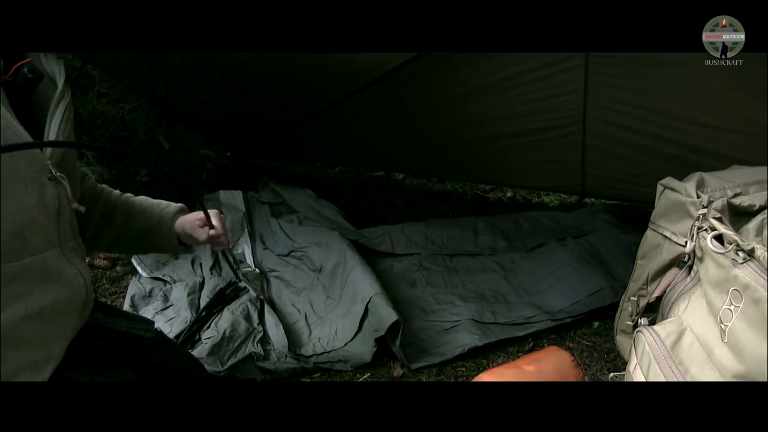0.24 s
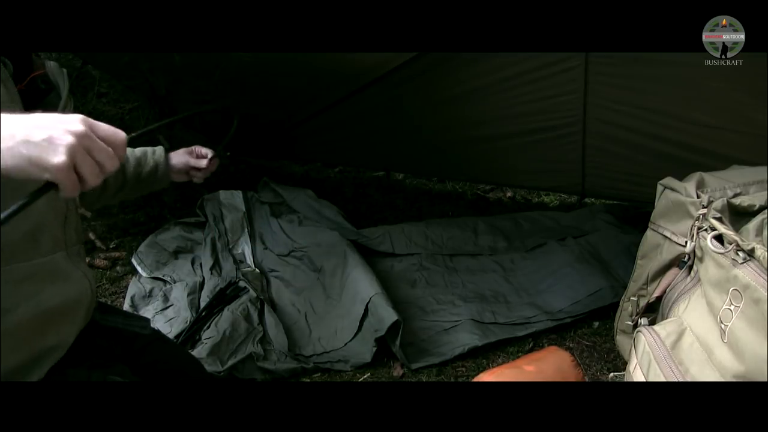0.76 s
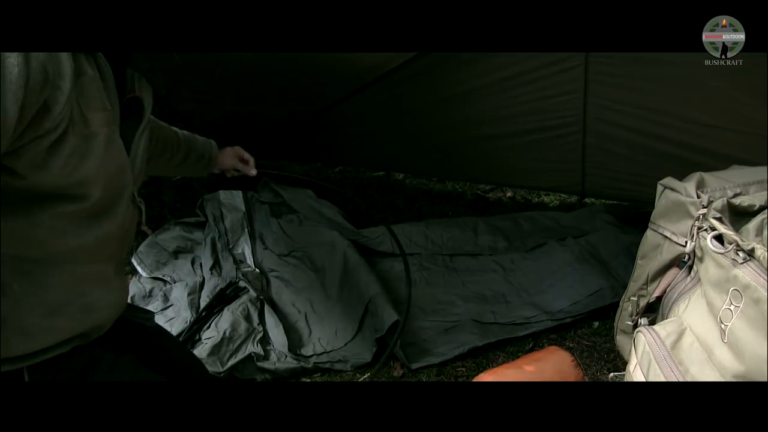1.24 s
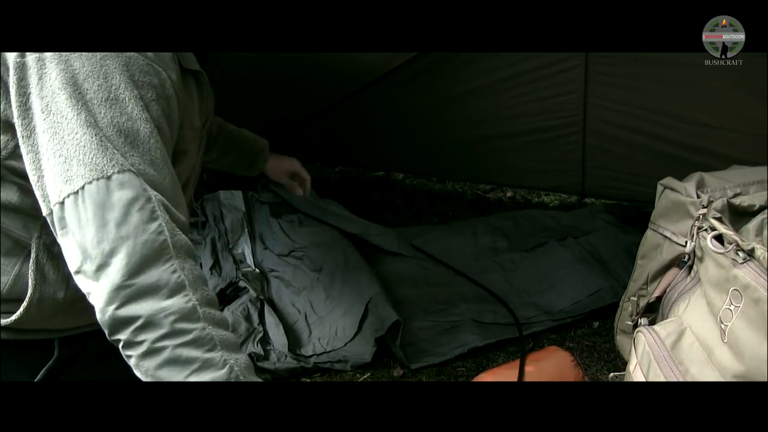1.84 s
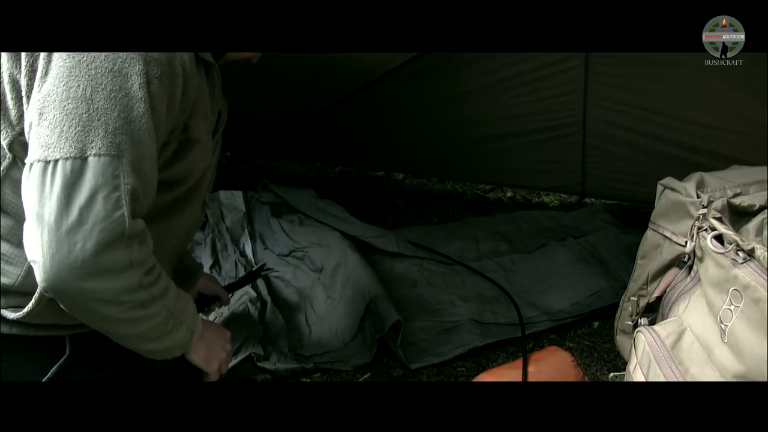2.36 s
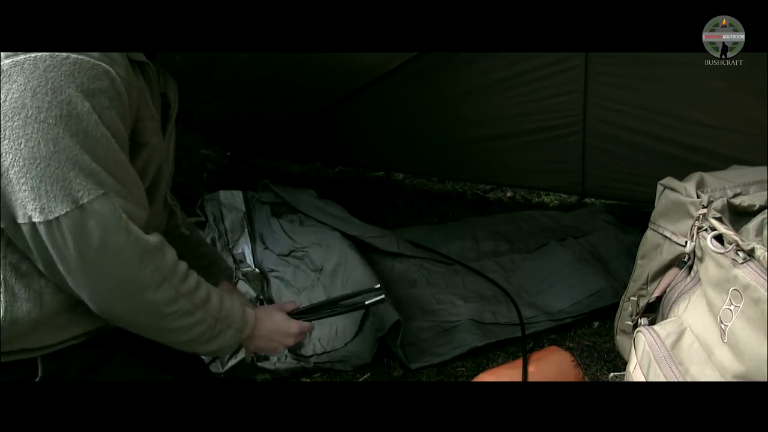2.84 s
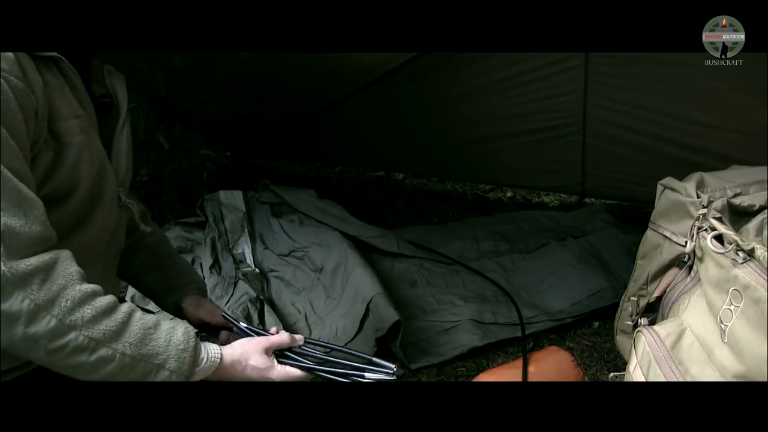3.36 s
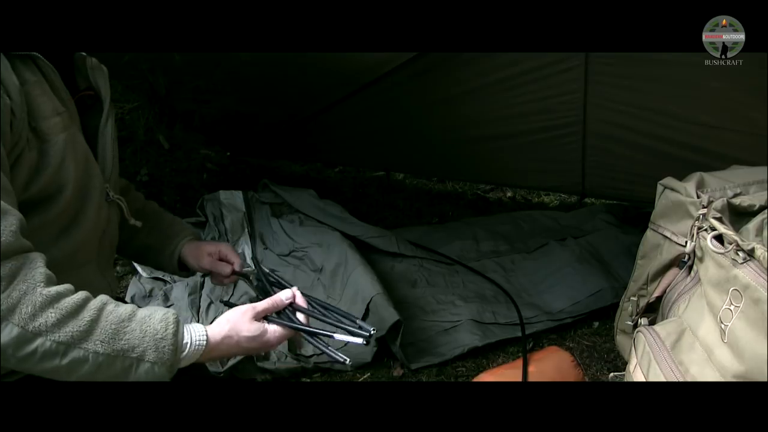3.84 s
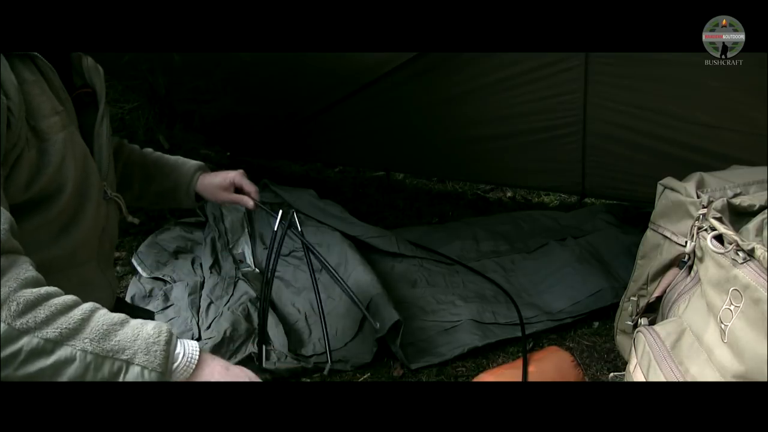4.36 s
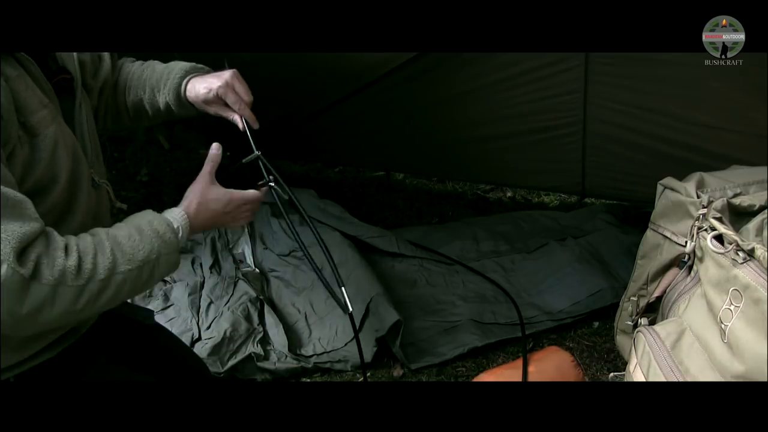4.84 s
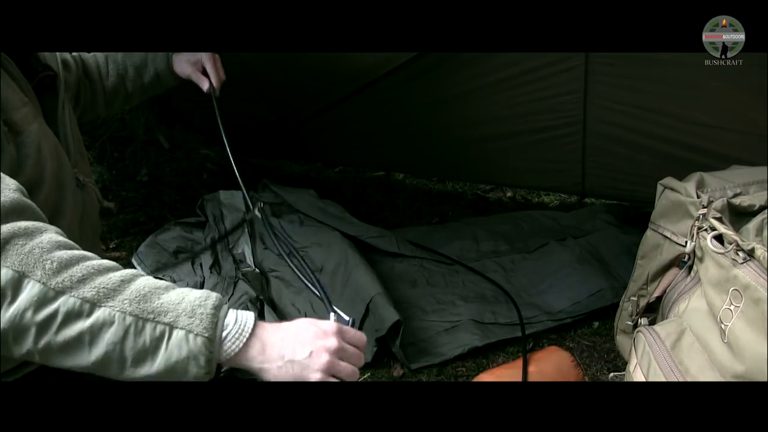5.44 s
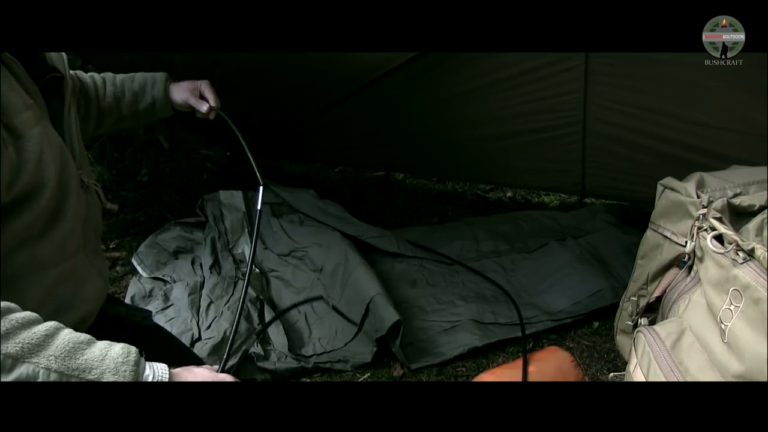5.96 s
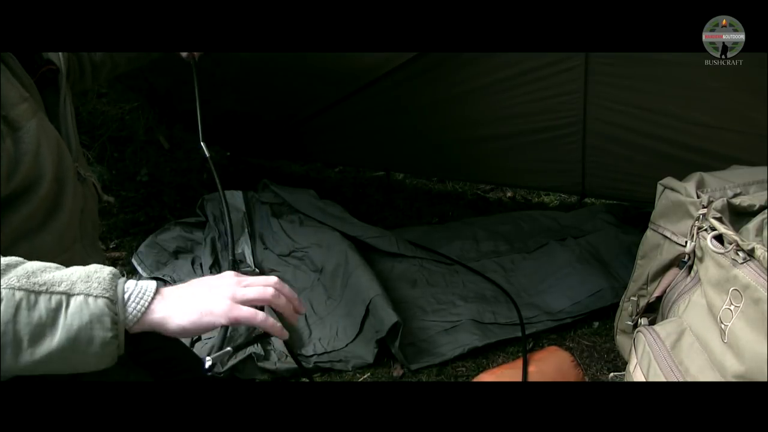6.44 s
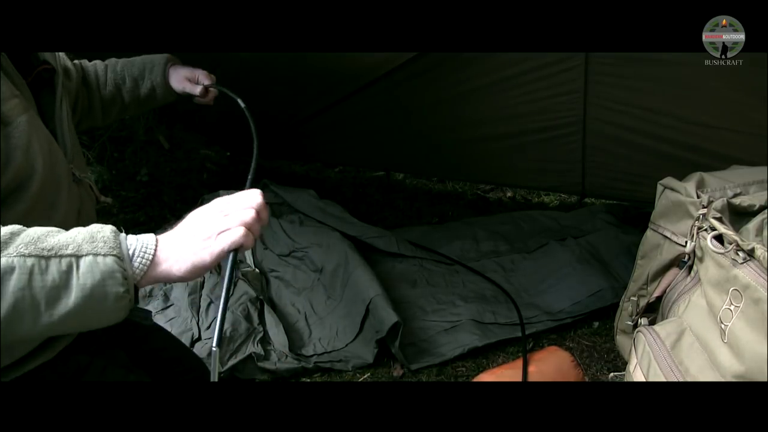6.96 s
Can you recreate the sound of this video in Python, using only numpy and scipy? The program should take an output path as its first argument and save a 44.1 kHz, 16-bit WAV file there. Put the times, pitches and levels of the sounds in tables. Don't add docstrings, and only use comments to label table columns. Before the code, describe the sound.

Hollow tent pole sections crack and rattle together close by, with cloth rustling, small birds whistling in echoing woods and a faint low drone.

```python
import sys
import numpy as np
from scipy import signal
from scipy.fft import rfft, irfft, next_fast_len
from scipy.io import wavfile
from scipy.ndimage import uniform_filter1d, map_coordinates

SR = 44100
rng = np.random.default_rng(int(sys.argv[2]) if len(sys.argv) > 2 else 0)


def invert_db(x):
    u = np.asarray(x, float) / 20
    return 10 ** u


def inscribe(sig):
    pcm = np.round(np.clip(np.atleast_2d(sig).T, -1, 1) * 32767)
    wavfile.write(sys.argv[1], SR, pcm.astype(np.int16))


N = 317520


def unit(x):
    return x / np.sqrt(np.mean(x ** 2) + 1e-20)


def along(points, hz):
    f, v = np.transpose(points)
    return np.interp(np.log(hz + 1), np.log(f + 1), v)


def curves(rows):
    s, *cols = np.transpose(rows)
    return [np.interp(np.arange(N) / SR, s, c) for c in cols]


def wobble(rate):
    knots = rng.standard_normal(int(N * rate / SR) + 4)
    return map_coordinates(knots, [np.arange(N) * rate / SR])


def rush(spectrum, alike, grain=1):
    m = next_fast_len(N + 8192)
    hz = np.fft.rfftfreq(m, 1 / SR)
    turn = np.arccos(np.clip(along(alike, hz), -1, 1)) / 2
    pair = rfft(rng.standard_normal((2, N)) * grain, m) * invert_db(along(spectrum, hz))
    mid, side = irfft(pair * [np.cos(turn), np.sin(turn)], m)[:, :N]
    return unit(np.array([mid + side, mid - side]))


def echoes(x, t60, delay):
    t = np.arange(round(t60 * SR)) / SR
    tail = rng.standard_normal((2, SR))[:, :len(t)] * invert_db(-60 * t[:SR] / t60) * (t[:SR] > delay)
    return signal.fftconvolve(x[None], tail / np.linalg.norm(tail[0]), axes=1)[:, :N]


def resonance(hz, centre, width):
    return 1j * hz * width / (centre ** 2 - hz * hz + 1j * hz * width)


# time in seconds, peak in dB, treble over middle in dB,
# low knock over middle in dB, strongest ring in Hz.
SNAPS = [(.3192, -9.5, 0, -5, 6300), (2.3459, -10, -3.5, -13, 9950), (2.7512, -7, -2, -15, 6800),
         (2.7632, -8.5, -1.5, -12, 7900), (2.8569, -12, -2, -15.5, 4380), (2.8659, -7, -4, -15, 9050),
         (2.9594, -16, 2, -12, 7600), (2.9885, -11.5, 1.5, -14.5, 9950), (3.5651, -12.5, -3.5, -11.5, 6940),
         (3.7496, -18, -4, -8, 4000), (4.0115, -10.5, -0.5, -5, 5500), (4.1415, -15.5, -2, -9.5, 10700),
         (4.3072, -13.5, -3.5, -10, 3760), (4.6096, -16, -5, -1.5, 6500), (4.6148, -8, 2, -4, 6360),
         (4.7252, -15, -2.5, -9.5, 5100), (5.2008, -11, -4, -20, 7020), (5.6333, -15, -3, -14, 4550),
         (5.6856, -9.5, -4, -3, 6500), (5.6951, -6, -1, -26, 6400), (6.0295, -16.5, 3.5, -4, 9600),
         (6.8621, -12, -13, -3, 4600), (6.8648, -8.5, -7.5, -14, 4800), (6.8702, -15, 14, -20, 4500)]
# time in seconds, peak in dB, strongest ring in Hz,
# low knock over middle in dB.
BUNDLE = [(2.2732, -26, 10700, -14), (2.2806, -33.5, 6105, -15), (2.2858, -29, 5430, -10),
          (2.294, -27, 4220, -14), (2.321, -44, 6000, -6), (2.3546, -17, 7100, -7.5),
          (2.5608, -18, 9600, -17), (2.591, -23, 6250, -14.5), (2.6198, -26, 6100, -11),
          (2.631, -28, 6390, -13), (2.641, -21.5, 6650, -15), (2.648, -29, 6000, -10),
          (2.668, -33, 5520, -11), (2.678, -40, 6000, -5), (2.698, -21, 4560, -17),
          (2.705, -23.5, 7000, -11.5), (2.7325, -24, 5930, -12.5), (2.77, -17, 2800, -15),
          (2.7805, -16, 8580, -18.5), (2.789, -23.5, 5000, -13), (2.797, -26, 2900, -10),
          (2.8381, -20, 2800, -7.5), (2.8487, -28, 4350, -18), (2.8725, -20, 8300, -15),
          (2.8968, -16, 8100, -20), (2.9043, -24, 6400, -19), (2.913, -26, 6500, -12),
          (2.9175, -26, 8800, -11), (2.9245, -19.5, 8700, -15), (2.9357, -19, 6030, -19),
          (2.9425, -25, 6000, -11), (2.967, -16.5, 7450, -16), (2.9756, -21, 8000, -8.5),
          (2.985, -19, 7000, -18), (2.995, -28, 4960, -11), (3.0441, -26.5, 5980, -11),
          (3.0485, -29.5, 6100, -7), (3.064, -35, 5500, -9)]
# time in seconds, peak in dB, strongest ring in Hz.
LOOSE = [(3.2926, -23, 6150), (3.3581, -25.5, 6570), (3.4, -35, 5350), (3.5628, -28, 6800),
         (3.804, -27.5, 4530), (3.8777, -28, 4600), (3.9523, -35, 5440), (3.9614, -29, 5340),
         (3.9681, -28, 2540), (3.9972, -30, 4220), (4.047, -24.5, 10600), (4.1495, -29, 5560),
         (4.163, -15.5, 10060), (4.1715, -20, 10400), (4.1988, -22.5, 6860), (4.2187, -28.5, 5560),
         (4.2583, -20.5, 5000), (4.3004, -35, 5430), (4.3253, -25, 4060), (4.3354, -28, 7780),
         (4.398, -35, 5500), (4.4147, -25.5, 5150), (4.4679, -20, 6650), (4.4731, -19, 8300),
         (4.5091, -25.5, 5200), (4.6047, -43, 4390)]
# time in seconds, peak in dB, strongest ring in Hz.
HANGING = [(4.827, -37.5, 4030), (5.0041, -28.5, 11000), (5.0432, -15.5, 5400), (5.126, -28, 3000),
           (5.1676, -23, 9400), (5.233, -22.5, 5700), (5.447, -35.5, 5500), (5.4818, -23, 5600),
           (5.4837, -19, 8080), (5.6172, -39, 5444), (5.6242, -27, 5700), (5.682, -17, 6700),
           (5.7236, -25.5, 7900), (5.768, -35, 5500), (5.7753, -32, 5500), (5.7935, -25, 6760),
           (5.8321, -27, 6550), (6.0375, -17.5, 8600), (6.0461, -26.5, 10070), (6.4413, -38, 5464)]
# time in seconds, peak in dB, strongest ring in Hz.
REBOUNDS = [
    (.3223, -14.5, 8700),
    (4.0141, -14, 5400),
    (4.268, -33, 5000),
    (4.339, -28, 5000),
    (4.626, -22, 6300),
    (5.1323, -30, 4510),
    (5.2064, -22.5, 7000),
    (5.653, -24, 6000),
    (5.6647, -26, 6000),
]
# time in seconds, peak in dB,
# low knock over middle in dB.
THUMPS = [(.2753, -44, 6), (1.849, -28, 2.5), (1.861, -38, -12), (1.871, -30, -7), (1.906, -33, 9),
          (1.9835, -23, 3.5), (1.989, -28, -6), (2.055, -37, -6), (3.4829, -35.5, 2), (3.5357, -38, 1),
          (4.853, -41, 4), (5.569, -36, 1), (6.1063, -37, 5.5), (6.379, -43, 0.5), (6.415, -28, -2),
          (6.8267, -33.5, -0.5), (6.8445, -34, 1)]
# time in seconds, peak in dB.
TICKS = [(.0507, -54), (0.3706, -41), (.576, -52), (0.957, -53), (1.008, -47.5), (2.23, -45.5), (3.35, -42),
         (3.9336, -39), (5.3406, -46), (5.865, -37), (5.8934, -57), (6.555, -46.5), (6.736, -50),
         (6.7718, -44.5)]


def contacts():
    # (treble, low knock) over middle in dB
    kinds = [(LOOSE, (-4.5, -11)), (HANGING + REBOUNDS, (-7, -11.5))]
    soft_treble_db, soft_ring_hz = -4.5, 5400
    small = [(s, db, *colour, hz) for rows, colour in kinds for s, db, hz in rows]
    small += [(s, db, -6, knock_db, hz) for s, db, hz, knock_db in BUNDLE]
    small += [(s, db, soft_treble_db, knock_db, soft_ring_hz) for s, db, knock_db in THUMPS]
    small += [(s, db, -3, -3, soft_ring_hz) for s, db in TICKS]
    scatter_db = 2 * rng.standard_normal((len(small), 2))
    varied = [(s, db, treble + a, knock + b, hz)
              for (s, db, treble, knock, hz), (a, b) in zip(small, scatter_db)]
    return list(SNAPS) + varied


# centre in Hz, width in Hz, level in dB.
TUBE = [(1274, 260, -9.5), (2794, 210, -2.5), (4300, 890, -1), (5130, 290, -5), (6570, 1570, 2),
        (8580, 1280, 1), (10700, 3600, -5)]
# frequency in Hz, level in dB.
CONTACT = [(80, -61), (300, -6), (900, -4), (2500, 0.5), (6000, 1), (12000, -2), (16000, -8.5)]


def tube_modes(hz, ring_hz, detune_luck, level_luck):
    modes = invert_db(-6)
    for (centre, width, db), shift, lift in zip(TUBE, detune_luck, level_luck):
        modes = modes + invert_db(db + 4 * lift) * resonance(hz, centre * (1 + 0.06 * shift), width)
    return modes + invert_db(9) * resonance(hz, ring_hz, 350)


def pole():
    size, lead = 4096, 256
    out = np.zeros((2, N + size))
    t, hz = (np.arange(size) - lead) / SR, np.fft.rfftfreq(size, 1 / SR)
    body_band = (hz > 4600) & (hz < 15000)

    def crack(after):
        return np.where(t >= after, 1, .12) * invert_db(-60 * np.abs(t - after) / .007)

    for s, db, treble_db, knock_db, ring_hz in contacts():
        noise, luck = rng.standard_normal((4, size)), rng.standard_normal((3, len(TUBE)))
        ground_db, ground_s = -5 + 2.0 * luck[2, 0], 0.0034 * (1 + .15 * luck[2, 1])
        shape = crack(0) + invert_db(ground_db) * crack(ground_s)
        rattle = invert_db(-11 - 60 * np.abs(t / 0.038) ** 1.55) * (1 - crack(0)) * (t >= 0)
        rattle = rattle * invert_db(2 * unit(uniform_filter1d(noise[3], size=24)))
        mid = np.sign(noise[0]) * shape + noise[1] * rattle
        side = 0.24 * noise[2] * (0.89 * shape + rattle)

        lean = along([(400, knock_db + 10.5 + 2 * max(knock_db + 0.5, 0)), (2200, knock_db + 9.5),
                      (3200, 0.33 * (knock_db + 14)), (7000, 0.0074), (9000, treble_db + 3.5)], hz)
        both = rfft([mid, side])
        both /= np.sqrt(uniform_filter1d(np.abs(both[0]) ** 2, size=70))
        both *= tube_modes(hz, ring_hz, luck[0], luck[1]) * invert_db(along(CONTACT, hz) + lean)
        both[1] *= invert_db(along([(1500, -4.5), (9000, 2)], hz))
        both /= np.linalg.norm(both[0, body_band]) / size ** .5
        mid, side = irfft(both, size)
        start = max(round(s * SR) - lead, 0)
        out[:, start:start + size] += invert_db(db + 16.0) * np.array([mid + side, mid - side])
    return out[:, :N]


def strokes(rows):
    t = np.arange(N) / SR
    power = 0
    for start, peak, end, db in rows:
        before = (peak - t) / max(peak - start, 1e-3)
        after = (t - peak) / max(end - peak, 1e-3)
        power = power + invert_db(2 * (db - 24 * np.maximum(before, after)))
    return power


# start, peak and end in seconds, level in dB.
SWISHES = [(.255, .272, 0.44, -43), (2.23, 2.317, 2.526, -38), (2.5, 2.835, 3.14, -40),
           (2.8, 3.05, 1.91, -53), (3.68, 3.78, 3.77, -48), (3.87, 3.89, 3.86, -38),
           (3.935, 3.993, 4.1, -34.5), (3.9, 4.303, 4.7, -47), (4.2, 4.504, 4.57, -43.5),
           (4.52, 4.653, 5.03, -49), (4.8, 4.847, 5.1, -53), (4.89, 4.945, 5.43, -46.5),
           (4.9, 5.039, 4.4, -46.5), (5.04, 5.163, 5.5, -48.5), (5.275, 5.337, 5.8, -48.5),
           (5.555, 5.585, 5.55, -36.5), (5.635, 5.678, 5.79, -29), (5.5, 5.8, 6.7, -50.5),
           (5.75, 5.948, 6, -44.5), (6.79, 6.857, 6.98, -39), (6.85, 6.94, 7.55, -57.5)]
# start, peak and end in seconds, level in dB.
DRAGS = [
    (1.853, 1.864, 1.89, -40.5),
    (1.89, 1.925, 2.15, -38),
    (1.9, 2.04, 1.5, -55),
    (3.272, 3.289, 3.32, -47),
    (3.45, 3.6, 4.1, -64.5),
    (6.09, 6.118, 6.24, -39.5),
    (6.17, 6.41, 6.2, -52.5),
]
# start, peak and end in seconds, level in dB.
BRUSH = [
    (.8, .98, 1.3, -59),
    (1.0, 1.28, 1.45, -60),
]
# frequency in Hz, level in dB.
CLOTH_COLOUR = [(800, -18.5), (2500, -1.5), (4200, 2), (6000, 1), (9000, -2.5), (15000, -17)]


def cloth():
    swish, drag, rest = strokes(SWISHES), strokes(DRAGS), invert_db(2 * -68)
    total = swish + drag + rest
    busy = 1 - rest / total
    grain = invert_db(busy * (2.7 * wobble(70) + 2.5 * wobble(400)))
    bright = rush(CLOTH_COLOUR, [(1000, 0.93), (12000, 0.84)], grain)
    dull_colour = [(200, -12.0), (500, -2.5), (1500, -11.5), (3000, -13.5), (5000, -27.5)]
    dull = rush(dull_colour, [(1000, 0.99)], grain)
    body = swish * invert_db(2 * -16) + drag * invert_db(2 * 2.5) + rest * invert_db(2 * 8.5)
    nylon = rush([(3000, -29), (6000, -9.5), (11000, -1), (15000, -4)], [(8000, .8)])
    return invert_db(2.5) * np.sqrt(total) * bright + np.sqrt(body) * dull + np.sqrt(strokes(BRUSH)) * nylon


def sung(rows, shape):
    return [(db, [(s + u * long, low + v * (high - low)) for u, v in shape])
            for s, long, low, high, db in rows]


def bird(notes, wet_db, t60, left_db):
    song = np.zeros(N + SR)
    for db, path in notes:
        s, hz = np.transpose(path)
        t = np.arange(max(s[0], 0), s[-1], 1 / SR)
        pitch = uniform_filter1d(np.interp(t, s, hz), size=70, mode="nearest")
        share = np.linspace(0, 1, len(t))
        swell = np.abs(np.sin(np.pi * share)) ** 0.3 * invert_db(-7 * share ** 2)
        whistle = np.sin(2 * np.pi * np.cumsum(pitch) / SR)
        song[round(t[0] * SR):][:len(t)] += invert_db(db + 4.5) * swell * whistle
    song = song[:N] * invert_db(2.2 * wobble(130))
    leaves = invert_db(-9) * echoes(song, t60=0.09, delay=0.004)
    pan = invert_db(np.array([[left_db / 2], [-left_db / 2]]))
    return (song + leaves) * pan + invert_db(wet_db) * echoes(song, t60=t60, delay=0.013)


# start in seconds, length in seconds, low Hz, high Hz, level in dB.
DOUBLES = [
    (.011, 0.032, 2500, 4080, -49),
    (6.352, 0.039, 3280, 4450, -49),
]
HOOKS = [
    (.163, 0.028, 2570, 4070, -47.5),
    (.401, 0.023, 2510, 3610, -53.5),
    (.578, 0.033, 2855, 4380, -54),
]
HELD = [
    (.082, .034, 2780, 4170, -49),
    (.224, 0.036, 2750, 3750, -57),
]
FALLS = [
    (.142, 0.014, 3000, 3130, -60),
    (.222, .013, 2830, 2900, -60),
    (.476, .02, 2800, 3920, -60),
    (.678, 0.014, 4420, 4470, -60),
    (.697, 0.016, 3130, 4200, -55.5),
    (.728, 0.0197, 3700, 4610, -61),
    (.742, 0.0199, 3450, 4200, -59),
    (.777, 0.013, 3220, 4020, -61),
]
DIVES = [
    (.537, 0.016, 2450, 4020, -57.5),
    (.606, .032, 2910, 4300, -55.5),
    (.655, 0.0154, 3200, 3900, -63),
]
RISES = [
    (6.432, .05, 3130, 4480, -50),
    (6.53, 0.075, 3394, 4250, -47),
]
DOUBLE = [(0, 1), (0.47, 0.42), (.62, 0.94), (1, 0)]
HOOK = [(0, 0.97), (.5, .47), (.68, 0.606), (1, 0.044)]
HOLD = [(0, .56), (.47, .49), (.62, 0.81), (1, 0)]
FALL = [(0, 0.96), (.55, 0.17), (1, 0)]
DIVE = [(0, 0.91), (1, 0.024)]
RISE = [(0, 0.055), (.45, .6), (.65, 0.504), (.8, 1), (1, 0.514)]


def warbler():
    notes = sung(DOUBLES, DOUBLE) + sung(HOOKS, HOOK) + sung(HELD, HOLD)
    notes += sung(FALLS, FALL) + sung(DIVES, DIVE) + sung(RISES, RISE)
    return bird(notes, wet_db=5.5, t60=1.0, left_db=19)


# start in seconds, end in seconds, low Hz, high Hz, level in dB.
TRILL = [
    (3.88, 4.27, 2600, 4500, -55),
    (4.93, 5.06, 2900, 4800, -52),
    (5.1, 5.5, 3200, 5300, -51),
    (5.76, 6.0, 3000, 5400, -54),
]


def trills():
    luck = rng.random((24, 2))
    gaps = np.cumsum(.5 + luck[:, 0]) / 55
    notes = []
    for t0, t1, low_hz, high_hz, db in TRILL:
        for s, (a, b) in zip(t0 + gaps, luck):
            if s < t1:
                notes.append((db - 6 * a, [(s, high_hz - 600 * a), (s + .014, low_hz + 600 * b)]))
    return bird(notes, wet_db=5, t60=.6, left_db=6)


# start in seconds, length in seconds, low Hz, high Hz, level in dB.
FAR_FALLS = [
    (3.88, .12, 2750, 2950, -66),
    (4.115, .025, 3700, 4000, -58),
    (4.17, .055, 4120, 4200, -56),
    (4.57, .035, 2400, 2850, -60),
    (5.11, .05, 3900, 4250, -54),
]
FAR_GLIDES = [
    (4.278, .142, 3050, 6100, -57),
]
FAR_SLURS = [
    (4.48, .095, 2850, 3020, -62),
]
GLIDE = [(0, 1), (.16, .7), (.47, .38), (.75, 0), (1, .04)]
SLUR = [(0, 0.19), (.35, 0.029), (.75, .8), (1, 0.96)]


def far_birds():
    notes = sung(FAR_FALLS, FALL) + sung(FAR_GLIDES, GLIDE) + sung(FAR_SLURS, SLUR)
    return bird(notes, wet_db=4, t60=.5, left_db=8)


# start in seconds, length in seconds, low Hz, high Hz, level in dB.
WHISTLER = [
    (5.92, 0.13, 7620, 8450, -46.5),
    (6.055, 0.093, 7280, 7550, -50),
    (6.175, 0.14, 7780, 8400, -49),
]
WAVERS = [
    (4.855, 0.093, 7900, 9130, -54),
]
ARCHES = [
    (5.87, 0.0345, 7600, 8300, -47),
]
WAVER = [(0, .15), (.2, .45), (.42, 0.12), (.6, .3), (.83, 0), (1, 0.77)]
ARCH = [(0, 0), (.35, 0.13), (.65, 1), (1, 0.054)]


def whistler():
    notes = sung(WHISTLER, SLUR) + sung(WAVERS, WAVER) + sung(ARCHES, ARCH)
    return bird(notes, wet_db=-3, t60=.6, left_db=3)


# time in seconds, level in dB, lower edge over level in dB.
DRONE = [(0, -41.5, -9.5), (.9, -43, -8), (2.13, -43.5, -5), (2.45, -41.5, -16), (2.89, -42.5, -5),
         (3.15, -39.5, -5.5), (4.19, -44.5, -15), (4.63, -37.5, -4.5), (5.01, -43, -5), (5.37, -37.5, -5.5),
         (6.09, -39, -11.5), (6.62, -41.5, -4), (7.2, -38.5, -4)]
# frequency in Hz, level in dB.
DRONE_COLOUR = [(15, -55.5), (25, -33), (92, -18), (140, -26), (167, -20.5), (244, 4), (300, 2.5),
                (425, -18), (531, -9.5), (729, -27.5), (789, -28), (1100, -54), (1430, -42), (2420, -120)]
# frequency in Hz, left-right likeness from 0 to 1.
DRONE_ALIKE = [(60, 0.96), (290, 0.86), (640, 0.66)]
# frequency in Hz, level in dB.
AIR_COLOUR = [(30, -3), (500, 9), (1000, -3), (2300, -11), (3200, -10), (8000, -17.5), (14000, -24.5)]


def forest():
    level_db, under_db = curves(DRONE)
    edge = rush([(120, -35), (170, 3.5), (220, 5.0), (260, -40)], DRONE_ALIKE)
    drone = rush(DRONE_COLOUR, DRONE_ALIKE) + invert_db(2.93 * under_db) * edge
    drone[1] = np.roll(drone[1], round(.00013 * SR))
    air = rush(AIR_COLOUR, [(150, 0.81), (1000, 0.11), (7000, 0.4)])
    return invert_db(level_db + 1.5 + 1.72 * wobble(7.4)) * drone + invert_db(-53.0) * air


def scene():
    clicks = pole()
    camp = invert_db(-17.5) * echoes(clicks.mean(0), t60=0.13, delay=0.00324)
    near = (clicks + camp + cloth()) * invert_db(np.array([[.6], [-.6]]))
    return near + warbler() + trills() + far_birds() + whistler() + forest()


def band_limit(x):
    return signal.sosfilt(signal.butter(12, 16660, fs=SR, output="sos"), x)


def record(dry):
    topped = dry / (1 + np.abs(dry) ** 8) ** (1 / 8)
    low_cut = signal.butter(2, 45, "highpass", fs=SR, output="sos")
    hz, _, z = signal.stft(signal.sosfilt(low_cut, topped), SR, nperseg=1024)
    treble_db = 10 * np.log10(np.sum(np.abs(z[:, hz > 9000]) ** 2, axis=(0, 1)) + 1e-12)
    edge_hz = np.interp(treble_db, [-64, -56, -30], [13700, 14400, 15900])
    kept = signal.istft(z * (hz[:, None] < edge_hz), SR, nperseg=1024)[1][:, :N]
    return band_limit(kept)


dry = scene()
out = record(dry)
inscribe(out)
```